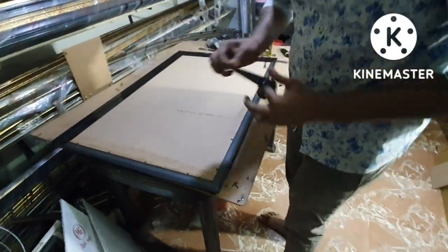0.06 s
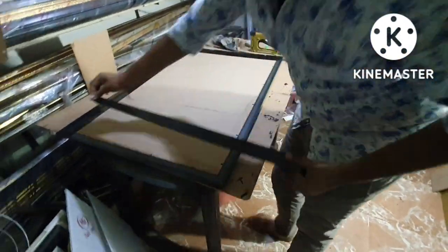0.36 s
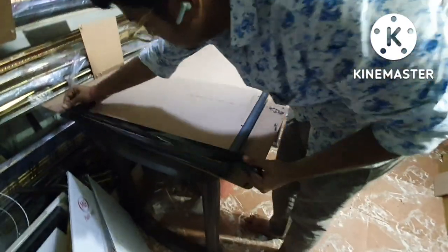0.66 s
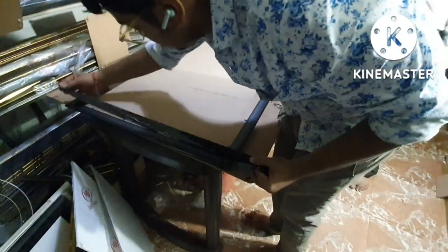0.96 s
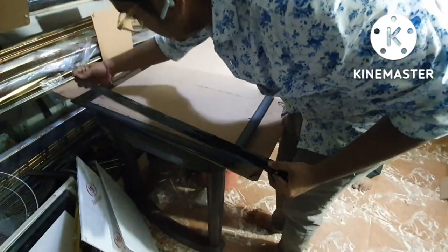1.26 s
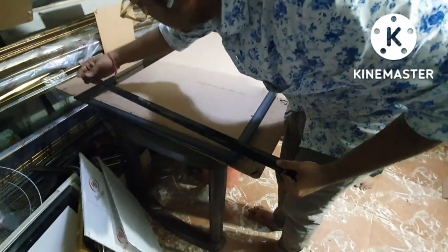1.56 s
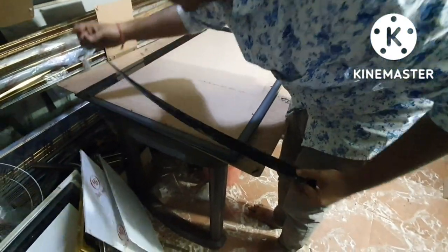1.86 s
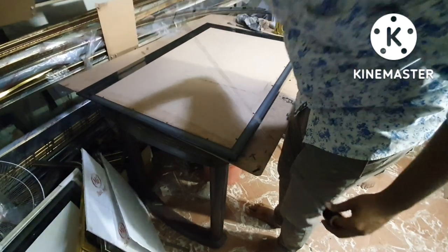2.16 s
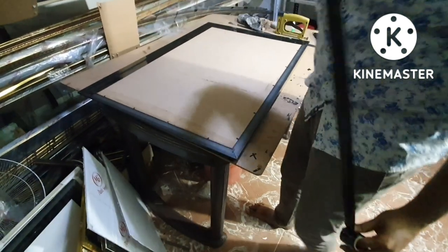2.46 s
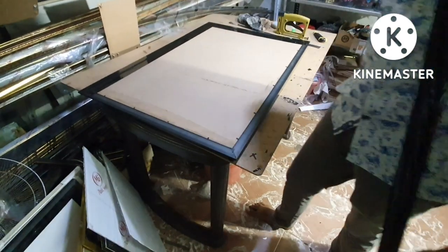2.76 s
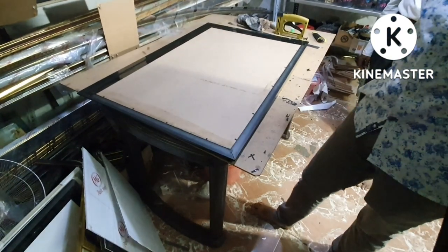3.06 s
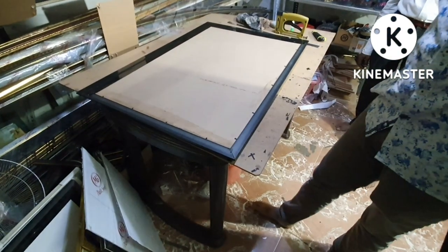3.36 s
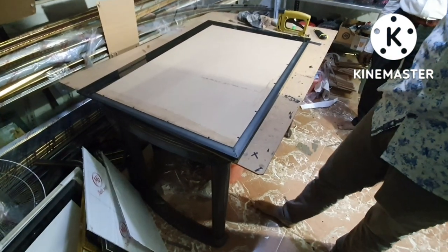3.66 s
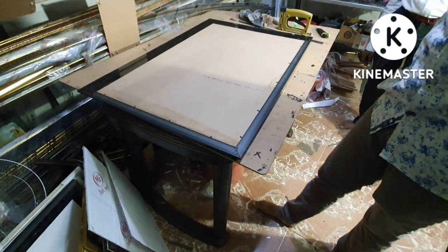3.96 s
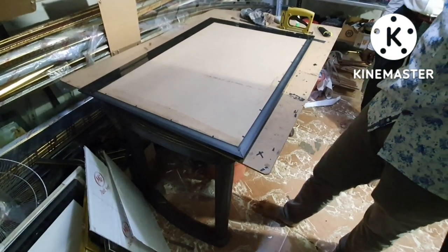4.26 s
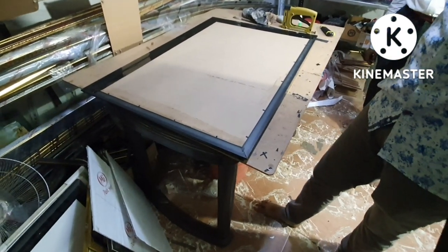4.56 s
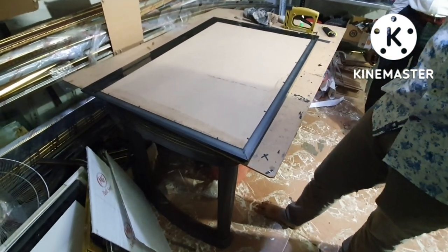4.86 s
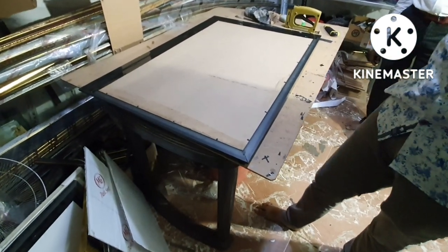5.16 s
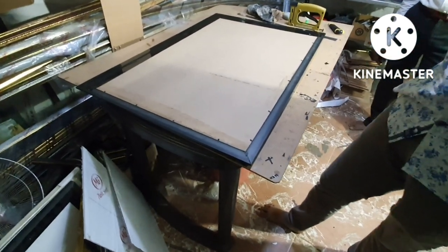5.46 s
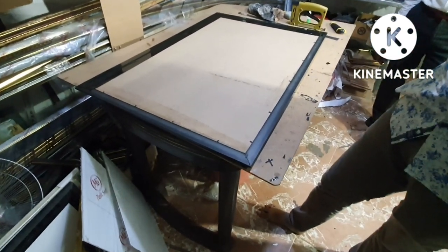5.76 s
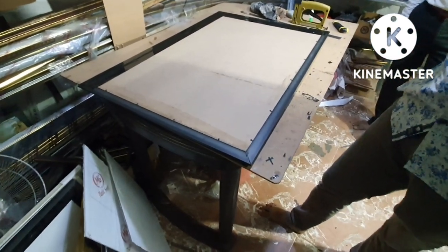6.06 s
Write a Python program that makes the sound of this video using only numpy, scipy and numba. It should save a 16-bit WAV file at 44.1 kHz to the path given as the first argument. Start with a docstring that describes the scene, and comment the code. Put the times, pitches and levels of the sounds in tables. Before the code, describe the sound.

A half-second rasp of sticky tape leaving the roll opens the scene, near the microphone and by far the loudest sound. Then come soft finger rubs, small ticks, crinkles and light taps as tape and a picture frame are handled on a worktable. The small shop has a short echo, a low wavering hum and muffled traffic noise, with two faint honks from a distant vehicle midway.

```python
"""Taping a picture frame

Adhesive tape leaves its roll in one quick rasp: stick-slip motion of the glue excites the roll and the
free strip, whose resonances fall as it lengthens. Fingers rub the tape down with a grainy friction
noise, and tape and frame tick, knock and crackle in a small reverberant shop. A low hum and street
noise lie underneath, and the vibrating diaphragm of a vehicle horn sounds far outside."""
import sys
import numpy as np
from scipy import signal
from scipy.fft import rfft, irfft, next_fast_len
from scipy.io import wavfile
from scipy.ndimage import uniform_filter1d
from numba import njit

SR = 44100
rng = np.random.default_rng(int(sys.argv[2]) if len(sys.argv) > 2 else 0)


def generate_wav(signal):
    """Clip the signal to [-1, 1] and save it as 16-bit WAV at the path in sys.argv[1]."""
    frames = np.transpose(np.atleast_2d(signal))
    scaled = np.clip(frames, -1, 1) * 32767
    pcm = np.round(scaled).astype(np.int16)
    wavfile.write(sys.argv[1], SR, pcm)


N = 269451
TIME = np.arange(N) / SR
BINS = np.fft.rfftfreq(N, 1 / SR)
BAND_LIMIT_HZ = 15700


def gain_of(db):
    """Amplitude ratio of a level in decibels."""
    return 10 ** (np.asarray(db) / 20)


def unit_rms(x):
    """Normalisation to unit mean power."""
    return x / np.sqrt(np.mean(x ** 2) + 1e-20)


def value_at(points, hz):
    """Interpolation of a table on a logarithmic frequency axis."""
    f, value = np.transpose(points)
    return np.interp(np.log(hz + 1), np.log(f), value)


def ramp(t, start, length):
    """Linear transition from 0 to 1."""
    return np.clip((t - start) / length, 0, 1)


def add(mix, start_s, sound):
    """Superposition of a sound on the mix, in place."""
    part = mix[..., max(round(start_s * SR), 0):][..., :sound.shape[-1]]
    part += sound[..., :part.shape[-1]]


def drift(bandwidth_hz):
    """Random modulation: low-pass Gaussian noise of unit rms."""
    size = next_fast_len(N)
    low_pass = np.exp(-(np.fft.rfftfreq(size, 1 / SR) / bandwidth_hz) ** 2)
    return unit_rms(irfft(rfft(rng.standard_normal(size)) * low_pass, size)[:N])


def panned(db):
    """Channel gains for a level difference, left minus right."""
    return gain_of(np.array([db, -db]).reshape(2, -1) / 2)


def band(x, lo_hz, hi_hz):
    """Butterworth band-pass filtering."""
    return signal.sosfilt(signal.butter(2, [lo_hz, hi_hz], "band", fs=SR, output="sos"), x)


def impulse(spectrum, treble_db=0, size=1024):
    """Minimum-phase click of unit energy; a treble shelf sets in between 6 and 12 kHz."""
    hz = abs(np.fft.fftfreq(size, 1 / SR))
    shelf_db = treble_db * np.clip(np.log2(hz / 6000 + 1e-9), 0, 1)
    log_gain = np.log(gain_of(value_at(spectrum, hz) + shelf_db))
    click = np.fft.ifft(np.exp(np.conj(signal.hilbert(log_gain)))).real[:size // 2]
    return click / np.linalg.norm(click)


@njit
def relax(x, pole):
    """First-order relaxation with a time-varying pole."""
    y = np.zeros_like(x)
    for i in range(1, len(x)):
        y[i] = pole[i] * y[i - 1] + (1 - pole[i]) * x[i]
    return y


def resonate(x, hz, width_hz):
    """Forced response of two equal resonators in cascade, with varying centre and bandwidth."""
    carrier = np.exp(2j * np.pi * np.cumsum(hz) / SR)
    pole = np.exp(-np.pi * width_hz / SR)
    for stage in range(2):
        x = 2 * (carrier * relax(x / carrier, pole)).real
    return x


# Likeness of the two channels: f/Hz, correlation coefficient
COHERENCE = [(60, 0.95), (220, 0.92), (450, 0.5), (800, 0), (1400, .05), (15000, 0.02)]
def diffuse(size):
    """Diffuse field: white noise at two points, coherent only at long wavelengths."""
    left, independent = rfft(rng.standard_normal((2, size)))
    shared = np.clip(value_at(COHERENCE, np.fft.rfftfreq(size, 1 / SR)), 0, 1)
    return irfft([left, shared * left + np.sqrt(1 - shared ** 2) * independent], size)


# Reverberation time of the shop: f/Hz, T60/s
REVERB_TIME = [(100, 0.37), (500, 0.25), (2000, 0.2), (6000, 0.21), (15000, 0.16)]
# Initial spectrum of its reflections: f/Hz, relative level/dB
REFLECTION_SPECTRUM = [(100, -10.5), (500, -5.5), (1200, 1), (15000, 1)]
def shop(x, wet_db, early_db=7, early_s=0.0035, left_lag_samples=9):
    """Reverberation: direct sound, strong early reflections, then an exponentially decaying tail."""
    hz, t, noise = signal.stft(diffuse(SR // 3), SR, nperseg=256)
    decay_db = value_at(REFLECTION_SPECTRUM, hz)[:, None] - 60 * t / value_at(REVERB_TIME, hz)[:, None]
    tail = signal.istft(noise * gain_of(decay_db), SR, nperseg=256)[1]
    t = np.arange(tail.shape[1]) / SR
    onset = np.clip(t / 0.0031 - .5, 0, 1)
    tail = tail * onset * gain_of(early_db * np.exp(-t / early_s))
    wet = signal.fftconvolve(x[None], tail / np.linalg.norm(tail[0]), axes=1)[:, :len(x)]
    direct = np.array([np.roll(x, left_lag_samples), x])
    return (direct + gain_of(wet_db) * wet) / np.sqrt(1 + gain_of(2 * wet_db))


# Street noise inside the shop: f/Hz, relative spectral level/dB
STREET_SPECTRUM = [(20, -11), (55, -0.5), (100, -7.5), (165, -15.5), (225, -12.5), (500, -21.5),
                   (1000, -23.5), (2450, -31.5), (3100, -29.5), (3900, -40), (7100, -44.5), (9300, -62.5),
                   (12500, -60.5), (15500, -61)]
# Its balance: f/Hz, left minus right level/dB
STREET_BALANCE = [(60, 0.5), (130, 1.5), (290, -2), (640, 0), (1410, -4.5), (3100, -6), (6820, -4),
                  (15000, -1)]
def street(first_db=-61, last_db=-57, growth_s=4, swell_db=0.32):
    """Diffuse, dull street noise whose level, referred to the midband, rises and then holds."""
    notch_db = -8 * np.exp(-((BINS - 58) / 16) ** 2)  # a dip around the hum
    spectrum = rfft(diffuse(N)) * gain_of(value_at(STREET_SPECTRUM, BINS) + notch_db)
    midband_rms = irfft(spectrum * ((BINS > 300) & (BINS < 2400)), N).std()
    noise = irfft(spectrum * panned(value_at(STREET_BALANCE, BINS)), N) / midband_rms
    db = first_db + (last_db - first_db) * ramp(TIME, 0, growth_s)
    return noise * gain_of(db + swell_db * drift(5))


# Envelope of the low hum: t/s, relative level/dB
HUM_ENVELOPE = [(0.8, -59), (0.96, -60.5), (1.08, -42), (1.36, -58.5), (1.48, -47.5), (1.74, -60.5),
                (2.07, -42), (2.44, -54), (2.63, -44.5), (2.66, -55.5), (2.91, -53), (3.01, -46),
                (3.58, -65), (3.65, -46.5), (3.75, -64), (5.11, -50.5), (5.18, -55.5), (5.49, -50.5),
                (5.52, -60.5), (5.64, -46.5), (5.79, -54), (6.1, -51)]
# Faint machine tones: f/Hz, level/dB
MACHINE_TONES = [(134, -72.5), (226, -68.5), (333.8, -67)]
def hum(hum_hz=58, waver_hz=2, gain_db=-.5, unsteady_db=1.5):
    """Random frequency and amplitude modulation make a low hum and three machine tones waver."""
    envelope_db = np.interp(TIME, *np.transpose(HUM_ENVELOPE))
    phase = 2 * np.pi * np.cumsum(hum_hz + waver_hz * drift(5.6)) / SR
    out = unit_rms(np.sin(phase)) * gain_of(envelope_db + gain_db + unsteady_db * drift(12))
    for hz, db in MACHINE_TONES:
        phase = 2 * np.pi * np.cumsum(hz + 1.5 * drift(18)) / SR
        out += gain_of(db) * unit_rms(np.sin(phase) * (1 + 1.2 * drift(3.4)))
    return out


# Faint far-off toots: t/s, duration/s, f/Hz, level/dB
FAR_TOOTS = [(0, 0.024, 817, -50.5), (5.38, 0.15, 1150, -67)]
def toots():
    """Tone bursts: sinusoids with tapered ends."""
    out = np.zeros(N)
    for start, length, hz, db in FAR_TOOTS:
        t = TIME[:round(length * SR)]
        burst = np.sin(2 * np.pi * hz * t) * signal.windows.tukey(len(t), .5)
        add(out, start, gain_of(db) * unit_rms(burst))
    return out


# Finger strokes on the tape: t/s, duration/s, level/dB, treble shelf/dB
STROKES = [(.008, 0.12, -45, -11), (1.107, 0.14, -52, 1.5), (2.028, 0.11, -56.5, -9),
           (2.366, 0.11, -69.5, -5.5), (2.625, 0.089, -51, -6), (3.301, 0.96, -68.5, -8),
           (3.861, 0.31, -68, 0), (5.671, .075, -57, 2)]
# Their friction noise: f/Hz, relative spectral level/dB
FRICTION_SPECTRUM = [(800, -22.5), (2200, -5), (3600, 1.5), (5200, -5.5), (7000, 2), (9300, -14),
                     (12000, -7.5), (15500, -11)]
def rubs(grain_db=4, pan_db=-6):
    """Sliding friction: grainy noise swells quickly and fades under each stroke."""
    out = np.zeros(N)
    grit = unit_rms(rng.standard_normal(N) * gain_of(grain_db * drift(500)))
    for start, length, db, treble_db in STROKES:
        progress = ramp(TIME, start, length)
        stroke = (grit * np.sin(np.pi * progress ** 0.31))[(progress > 0) & (progress < 1)]
        add(out, start, gain_of(db) * np.convolve(stroke, impulse(FRICTION_SPECTRUM, treble_db)))
    return shop(out, wet_db=2) * panned(pan_db)


PULL_START_S, JERK_S, PULL_END_S = .0665, .109, .508  # the tape starts, jerks tight and stops
def stick_slip(rate_hz, jitter=.32, spread_db=3):
    """Relaxation oscillation of the glue: irregular slips, each with a burst of snapping threads."""
    cycles = np.cumsum(rate_hz * np.exp(jitter * drift(150)[:SR])) / SR
    slips = np.diff(np.floor(cycles), prepend=0) * np.sqrt(SR / rate_hz)
    slips *= gain_of(spread_db * rng.uniform(-2, 1.5, SR))
    slips -= uniform_filter1d(slips, 600)  # remove the steady part of the force
    bursts = 0.13 + np.exp(-(cycles % 1) / .2)
    threads = unit_rms(rng.standard_normal(SR) * bursts * gain_of(3 * drift(900)[:SR]))
    return slips, threads


def crackle_level(t, tight, hang_db=-8, overshoot_db=3.5, ease_at_s=.35, ease_db_per_s=55):
    """Level follows the pull: it dips before the jerk, overshoots, holds and eases off."""
    jerk_db = (hang_db * (1 - tight) + overshoot_db * tight) * np.exp(-abs(t - JERK_S) / 0.009)
    return -14.5 + jerk_db - ease_db_per_s * np.maximum(t - ease_at_s, 0)


# Crack of the glue letting go: f/Hz, relative spectral level/dB
GLUE_SPECTRUM = [(150, -29), (500, -14.5), (1100, -3.5), (2000, 1), (3100, 3.5), (4800, -3.5), (6600, 3),
                 (7900, -2), (9500, -16.5), (12000, -5), (15500, -11.5)]
def glue_cracks(force, tight):
    """Fracture of the glue radiates broadband clicks, thinner while the tape is slack."""
    cracks = signal.fftconvolve(force, impulse(GLUE_SPECTRUM))[:SR]
    return tight * cracks + (1 - tight) * gain_of(2) * band(cracks, 900, BAND_LIMIT_HZ)


# Resonances of the free strip, fundamental f1: f/f1, bandwidth/f1, relative level/dB
STRIP_RESONANCES = [(1, .32, 2), (2.7, 0.22, -6), (.52, 0.11, -4)]
def strip_ring(t, pluck, tight, active, wave_m_per_s=680, hand_m_per_s=1.95, grip_width_hz=130):
    """Standing waves: the fundamental c/2L falls as the hand draws the strip out."""
    first_m, draw_at_s, gather_s = .1, .163, .022
    length_m = first_m + hand_m_per_s * gather_s * np.logaddexp(0, (t - draw_at_s) / gather_s)
    hz = wave_m_per_s / (2 * length_m)
    ring = sum(gain_of(db) * resonate(pluck, ratio * hz, width * hz + grip_width_hz)
               for ratio, width, db in STRIP_RESONANCES)
    ring = band(ring / np.sqrt(hz), 180, 9000)  # the ring stays between 180 Hz and 9 kHz
    slack_db, sag_db_per_s = -28.5, 13.5
    damping_db = -15 * ramp(t, .395, .05)  # the hand comes down
    taut_db = -15.5 - sag_db_per_s * (t - JERK_S) + damping_db
    return ring / ring[active].std() * gain_of(slack_db * (1 - tight) + taut_db * tight)


# Resonances of the roll's hollow core: f/Hz, bandwidth/Hz, relative level/dB
CORE_RESONANCES = [(430, 220, -9.5), (1150, 580, -12.5)]
def roll_ring(pluck, rate_hz, tight, active, crackle_db, slack_db=-12, gain_db=-19):
    """Forced vibration of the core, stronger under taut tape and slow, long slips."""
    force = pluck * gain_of(slack_db * (1 - tight)) / rate_hz ** 0.11
    ring = sum(gain_of(db) * band(force, hz - width / 2, hz + width / 2)
               for hz, width, db in CORE_RESONANCES)
    return ring / ring[active].std() * gain_of(gain_db + crackle_db / 2)


def strip_flap(t, pluck, tight, active, first_hz=720, width_hz=160, fall_s=0.061, fade_s=.07, db=-33):
    """Damped transient: the jerk sets the strip flapping at a falling pitch."""
    since = np.maximum(t - JERK_S, 0)
    flap = resonate(pluck, first_hz * np.exp(-since / fall_s), np.full(SR, width_hz))
    return flap / flap[active].std() * tight * gain_of(db) * np.exp(-(since / fade_s) ** 2)


# Balance of the rasp: f/Hz, left minus right level/dB
PULL_BALANCE = [(300, -0.5), (800, 0.5), (1500, 0.5), (2900, -3.5), (6900, -5.5), (8100, 2.5), (9500, 1),
                (15000, 1)]
def pull(fast_hz=1500, slow_hz=28, slowing_at_s=.175, slowing_s=.095, thud_db=-30):
    """Stick-slip excitation: ever slower slips crack, thud and pluck the strip and the roll."""
    t = TIME[:SR]
    tight = ramp(t, JERK_S - .003, .003)
    moving = ramp(t, PULL_START_S, .008) * ramp(-t, -PULL_END_S, .006)
    active = moving > .5
    crackle_db = crackle_level(t, tight)
    rate_hz = slow_hz + (fast_hz - slow_hz) * np.exp(-np.maximum(t - slowing_at_s, 0) / slowing_s)
    slips, threads = stick_slip(rate_hz)
    pluck = (slips + 0.38 * threads) * moving
    rasp = glue_cracks(unit_rms(.42 * slips + threads) * moving * gain_of(crackle_db), tight)
    rasp += strip_ring(t, pluck, tight, active)
    rasp += roll_ring(pluck, rate_hz, tight, active, crackle_db)
    rasp += strip_flap(t, pluck, tight, active)
    thuds = band(slips * moving / rate_hz * gain_of(crackle_db), 100, 520)
    rasp += thuds / thuds[active].std() * gain_of(thud_db)
    heard = shop(np.pad(rasp, (0, N - SR)), wet_db=2)
    return irfft(rfft(heard) * panned(value_at(PULL_BALANCE, BINS)), N)


# Ticks of tape and frame: t/s, relative level/dB, treble shelf/dB
TICK_EVENTS = [(1.3011, -50, -5.5), (1.471, -47, 0), (1.839, -60, -8.5), (2.0239, -57, -8),
               (2.6556, -51.5, -10), (2.7183, -60, -8), (2.7436, -49, -4), (3.065, -57, -12.5),
               (3.249, -57.5, -5), (3.333, -55.5, -11), (3.5067, -44, -1), (3.6847, -57.5, -10),
               (3.8683, -58, 3), (4.0195, -55, -11), (4.438, -62.5, -9), (4.925, -70.5, -13),
               (5.111, -49.5, -1.5), (5.206, -47.5, 2), (5.3346, -43.5, -4), (5.6828, -46.5, 0),
               (5.7141, -50, 0), (5.8569, -48, -14), (5.8728, -58.5, -1), (5.914, -60.5, -24)]
# Sound of one tick: f/Hz, relative spectral level/dB
TICK_SPECTRUM = [(400, -30), (1500, -1), (3000, 0), (4400, 0), (5500, 1), (7300, 8), (9300, -14.5),
                 (12000, 1.5), (15500, -11.5)]
def ticks(gain_db=29, crumble=0.16, halving_db=9, pan_db=-4):
    """Impulsive sources: each tick has a trail of tiny crackles and the echoes of its own position."""
    out, t = np.zeros((2, N)), TIME[:800]
    for start, db, treble_db in TICK_EVENTS:
        crumble_s = .0024 * .5 ** ((db + 50) / halving_db)  # harder ticks have shorter trails
        burst = (t == 0) + crumble * rng.standard_normal(len(t)) * np.exp(-t / crumble_s)
        click = np.pad(np.convolve(burst, impulse(TICK_SPECTRUM, treble_db)), (0, SR // 5))
        heard = shop(click / np.linalg.norm(click), wet_db=-1.5, early_db=20)
        add(out, start, gain_of(db + gain_db) * heard)
    return out * panned(pan_db)


# Knocks on the wood: t/s, relative level/dB, upper cutoff f/Hz
KNOCK_EVENTS = [(2.719, -37.5, 5970), (2.7435, -30, 5520), (3.669, -41, 1900), (4.243, -39.5, 1700),
                (5.335, -46, 3000)]
# Response of the frame: f/Hz, relative spectral level/dB
WOOD_SPECTRUM = [(200, -62), (700, 1.5), (1400, 5.5), (2200, 6), (3500, 9), (5000, -3), (9000, -26),
                 (15000, -20)]
def knocks(gain_db=16, decay_s=0.0023, pan_db=-5.5):
    """Heavily damped impacts on the frame; each has its own treble cutoff, and some are dull."""
    out, t = np.zeros(N), TIME[:800]
    for start, db, top_hz in KNOCK_EVENTS:
        burst = rng.standard_normal(len(t)) * np.exp(-t / decay_s)
        knock = band(np.convolve(burst, impulse(WOOD_SPECTRUM)), 300, top_hz)
        add(out, start, gain_of(db + gain_db) * knock / np.linalg.norm(knock))
    return shop(out, wet_db=-2, early_db=10) * panned(pan_db)


def crinkles(start_s=2.9, per_s=12, softest_db=-81, spread_db=7):
    """A Poisson process of tiny ticks as the tape crinkles between the fingers."""
    chance, size = rng.random((2, N))
    clicks = (chance < per_s / SR) * (TIME > start_s) * gain_of(softest_db + spread_db * size)
    return shop(signal.oaconvolve(clicks, impulse(TICK_SPECTRUM, treble_db=-2.5))[:N], wet_db=-9)


def multipath():
    """Interference of a steady path with scattered ones gives a fluctuating complex amplitude."""
    return .4 + drift(48) + 1j * drift(48)


# Partials of the horn: harmonic number, relative level/dB
HORN_HARMONICS = [(6, -16.5), (7, 3.5), (8, -1), (9, -13.5), (10, -21), (17, -24)]
# Its blasts: t/s, duration/s, level/dB
HORN_BLASTS = [(3.263, 0.53, -50.5), (3.897, .035, -57), (3.989, 0.29, -51)]
def horn(fundamental_hz=414, rise_s=0.03, fade_s=0.058, pan_db=-5):
    """Harmonics of a buzzing diaphragm peak at its disc resonance near 3 kHz and flutter with echoes."""
    phase = 2 * np.pi * fundamental_hz * TIME
    buzz = np.zeros((2, N))
    for side in range(2):
        partials = sum(gain_of(db) * multipath() * np.exp(1j * k * phase) for k, db in HORN_HARMONICS)
        buzz[side] = unit_rms(partials.real)
    envelope = np.zeros(N)
    for start, length, db in HORN_BLASTS:
        release = np.exp(-np.maximum(TIME - start - length, 0) / fade_s)
        envelope += gain_of(db) * ramp(TIME, start, rise_s) * release
    return buzz * envelope * panned(pan_db)


def peel(start_s=5.184, end_s=5.21, band_hz=(4900, 6600), peak_db=-42, swell_db=10, pan_db=-5):
    """Adhesive failure: a narrow-band fizz swells until a bit of glue lets go."""
    progress = ramp(TIME, start_s, end_s - start_s)
    fizz = unit_rms(band(rng.standard_normal(N), *band_hz)) * ((progress > 0) & (progress < 1))
    return shop(fizz * gain_of(peak_db - swell_db * (1 - progress)), wet_db=-4) * panned(pan_db)


def scene():
    """Superposition of all sources beside the table."""
    taping = pull() + ticks() + peel() + crinkles() + knocks() + rubs()
    return taping + horn() + toots() + hum() + street()


def record(dry):
    """Clipping at full scale, then low-pass band limiting."""
    low_pass = signal.firwin(301, BAND_LIMIT_HZ, window=("kaiser", 9), fs=SR)
    return signal.oaconvolve(np.clip(dry, -1, 1), low_pass[None], "same")


dry = scene()
out = record(dry)
generate_wav(out)
```